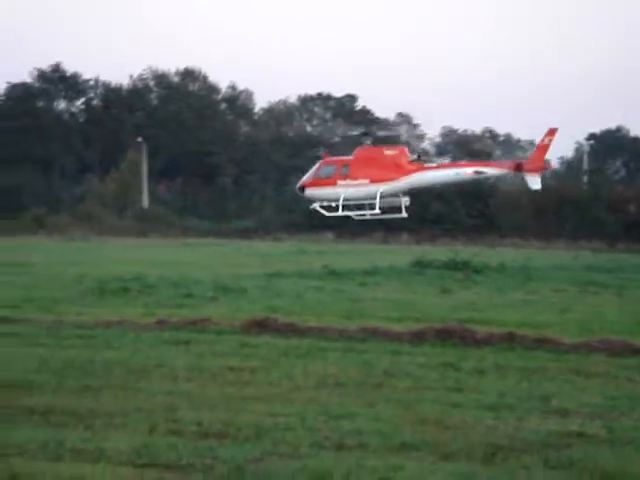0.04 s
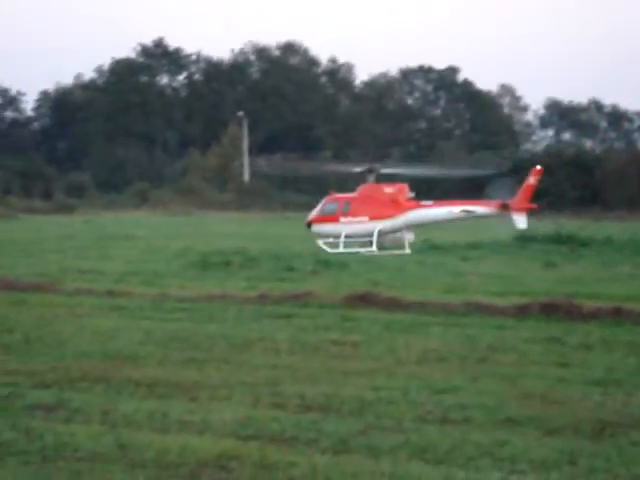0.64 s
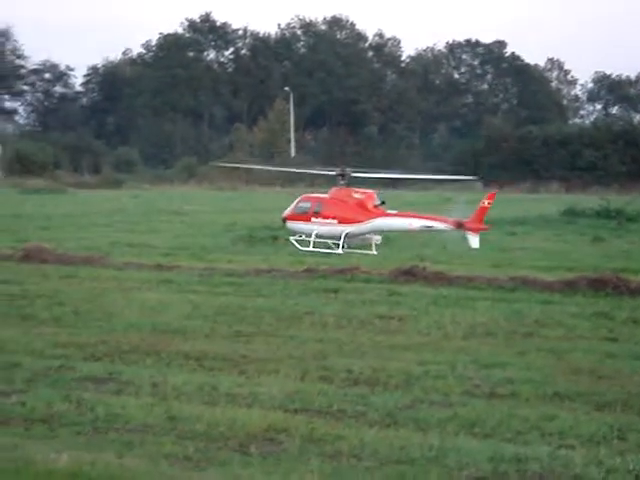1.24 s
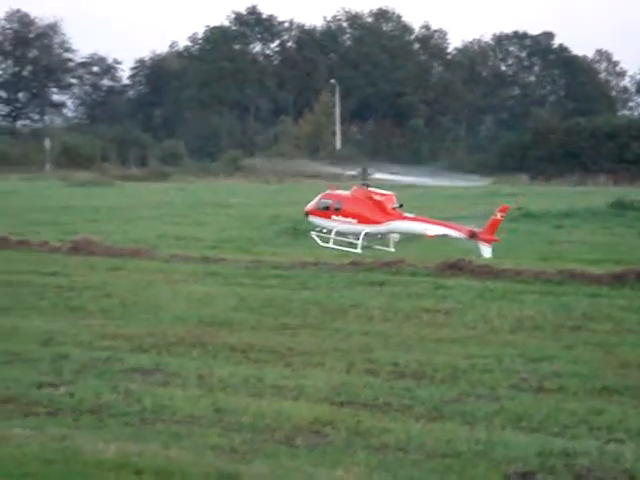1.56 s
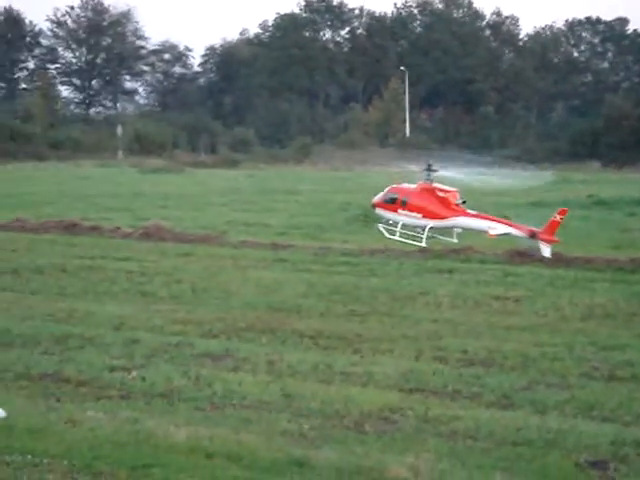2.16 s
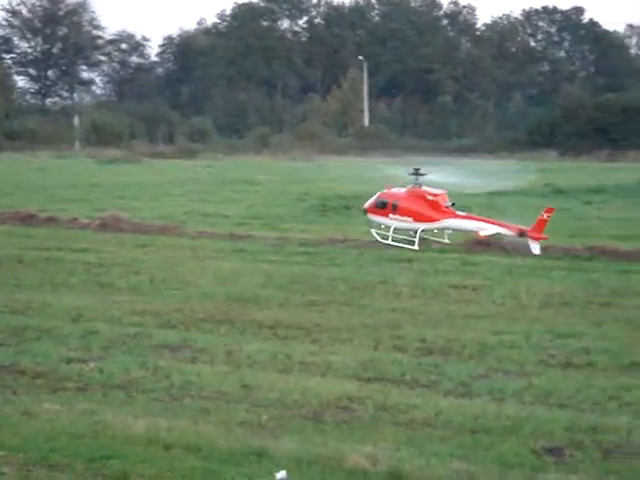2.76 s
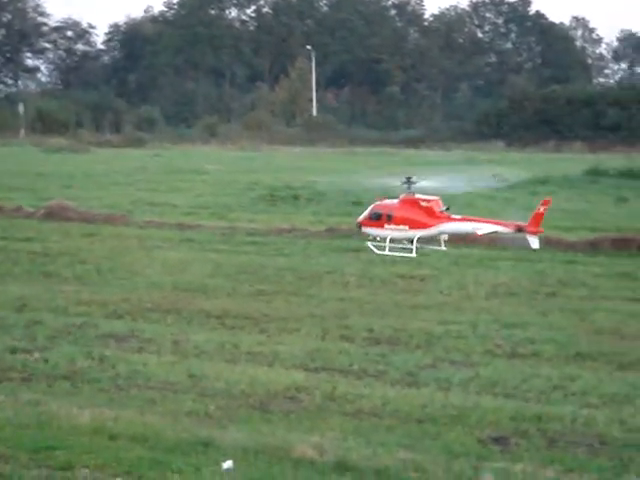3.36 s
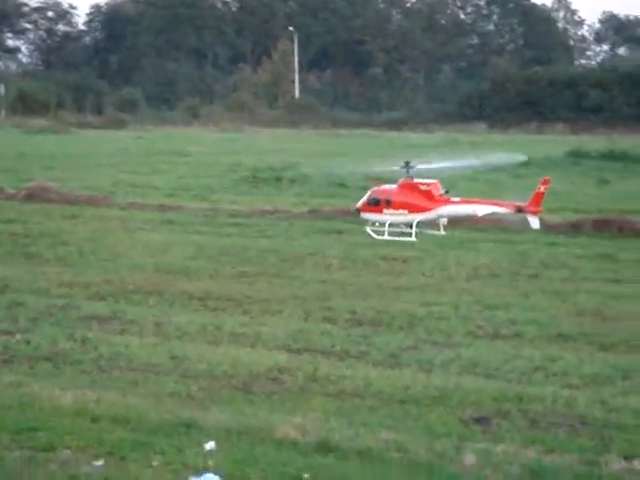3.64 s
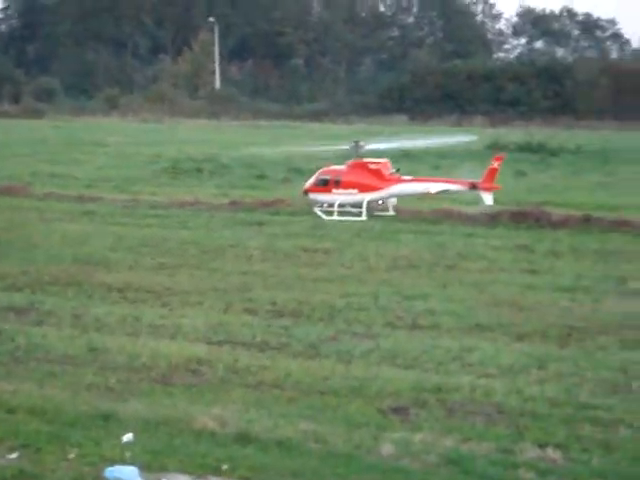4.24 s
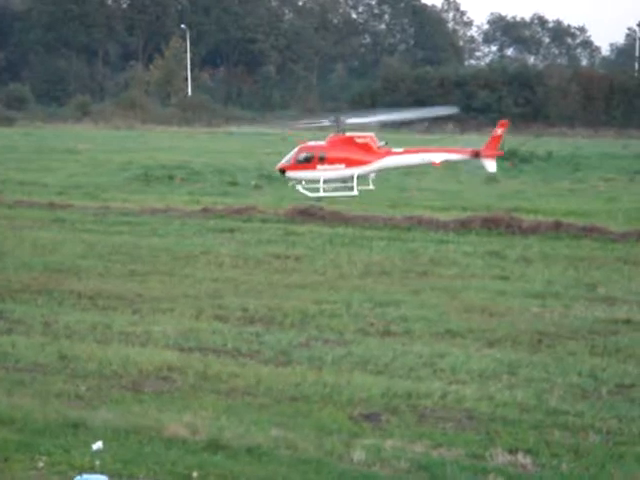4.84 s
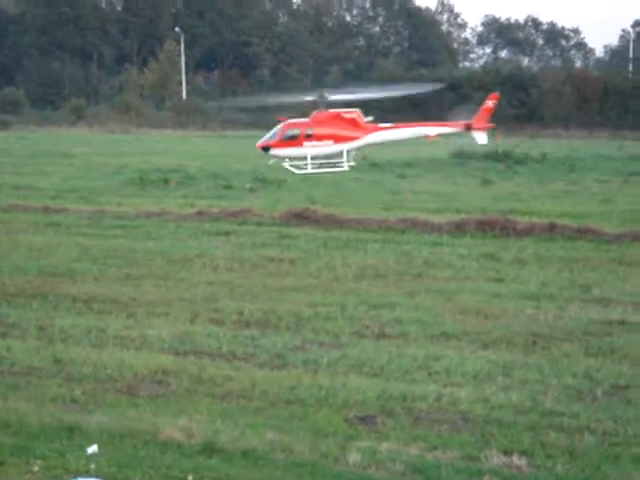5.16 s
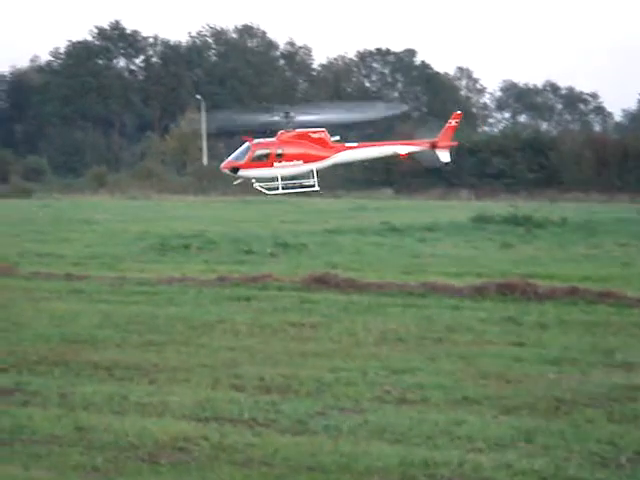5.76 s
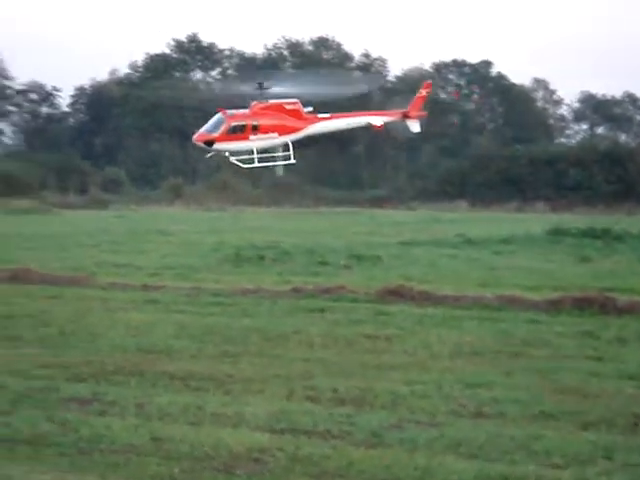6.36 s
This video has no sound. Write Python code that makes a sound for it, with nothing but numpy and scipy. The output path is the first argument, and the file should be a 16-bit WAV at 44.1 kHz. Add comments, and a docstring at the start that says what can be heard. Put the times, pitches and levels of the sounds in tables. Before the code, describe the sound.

Outdoors on a field, a small electric helicopter runs continuously several metres from the microphone. A bright, fluttering whine and metallic gear buzz ride on whirring rotors and a soft hum. The whine softens as the craft sinks and hovers, then returns with a sweeping, shifting tone as it climbs. Light wind bumps the microphone near the start and again near the end.

```python
"""An electric model helicopter hovers low over a grass field, sinking and climbing again.
One motor shaft drives it all: a fluttering whine, a low hum, the chop of the blades,
and the tones, rasp and clicks of the gears. The echo off the ground lifts some pitches and
cancels others, so the tone sweeps as the height changes. A few puffs of wind hit the microphone."""
import sys
import numpy as np
from scipy import signal
from scipy.fft import rfft, irfft, next_fast_len
from scipy.io import wavfile
from scipy.ndimage import map_coordinates

SR = 44100
rng = np.random.default_rng(int(sys.argv[2]) if len(sys.argv) > 2 else 0)


def waveform_to_disk(signal):
    """Save audio, clipped to [-1, 1], as 16-bit WAV at the path in sys.argv[1]."""
    frames = np.transpose(np.atleast_2d(signal))
    scaled = np.clip(frames, -1, 1) * 32767
    samples = np.round(scaled).astype(np.int16)
    wavfile.write(sys.argv[1], SR, samples)


N = 291501

# An "order" is a pitch given as a multiple of the motor speed.
WHINE_ORDERS, WHINE_GAIN_DB, FLUTTER_DEPTHS = (8, 9, 18), (1, 1.46, 2.5), (0.32, 0.051, 0.028)
RING_ORDERS, RING_DB, RING_FLUTTER_DEPTH = (16, 16.475), (-38.5, -40), 0.2
TURNS_PER_FLUTTER = 19.5
# swells of the low, middle and top whine tones: (time [s], relative level [dB])
LOW_SWELLS = [(0.03, -26.5), (0.28, -33.5), (0.54, -21), (0.94, -22.5), (1.68, -49), (2.1, -37),
              (4.48, -27), (4.53, -23), (5.13, -26), (5.33, -40), (5.44, -26.5), (5.79, -30), (6.18, -23.5),
              (6.55, -26)]
MID_SWELLS = [(0.03, -34), (0.17, -48), (0.26, -31), (0.65, -39), (1.04, -34), (1.9, -30), (2.32, -35),
              (2.55, -44), (3.97, -45), (4.55, -30), (4.79, -39), (5.01, -26.5), (6.08, -38), (6.55, -26.5)]
TOP_SWELLS = [(0.02, -26), (0.13, -24), (0.22, -41), (0.33, -26.5), (0.48, -39), (0.62, -25), (0.79, -27),
              (0.88, -38), (1.2, -25.5), (1.52, -36.5), (4.34, -27), (4.49, -35), (4.84, -31.5), (5.0, -48),
              (5.2, -29), (5.8, -27.5), (5.95, -40), (6.11, -25.5), (6.4, -20.5), (6.57, -24)]
# how hard the gears work, which also drives their tones and clicks: (time [s], load [dB])
GEAR_LOAD = [(0, -1), (.5, 3.5), (1, 9), (1.7, 6.5), (2.1, 0), (3.3, -4.5), (4.2, -1.5), (5.8, -17.5),
             (6.6, 9.5)]
# how deeply the whine flutters: (time [s], share [0-1])
FLUTTER_AMOUNT = [(0, 0.2), (.6, 0.9), (.9, 1), (2.8, .7), (4.4, 0.8), (4.8, 0.7), (5.1, 0), (6.6, 0.2)]
def whine(turns):
    """High motor tones flutter about ten times a second, like two close tones beating."""
    (amount,), (load_db,) = in_time(FLUTTER_AMOUNT), in_time(GEAR_LOAD)
    flutter = amount * np.sin(2 * np.pi * turns / TURNS_PER_FLUTTER + 1.1 * drift(1.5))
    swells = (LOW_SWELLS, MID_SWELLS, TOP_SWELLS)
    gains = [from_db(db) * swell_gain(curve) for curve, db in zip(swells, WHINE_GAIN_DB)]
    voices = list(zip(WHINE_ORDERS, gains, FLUTTER_DEPTHS))
    for order, db in zip(RING_ORDERS, RING_DB):  # loaded gears add a metallic ring
        ring_gain = from_db(db + 0.67 * load_db) * ground_gain(order, share=0.74)
        voices.append((order, ring_gain, RING_FLUTTER_DEPTH))
    return sum(gain * rms_one(1 + depth * flutter) * tone(turns, order, depth * amount, waver_hz=30)
               for order, gain, depth in voices)


def swell_gain(curve, roundness=0.33):
    """The whine swells and fades, largely as its ground echo lifts and cancels it."""
    times, db = np.transpose(curve)
    # round tops and narrow gaps
    return np.interp(np.arange(N) / SR, times, from_db(db) ** roundness) ** (1 / roundness)


# the shaft's own note: (time [s], relative level [dB])
SHAFT_LEVEL = [(0.03, -37), (0.14, -33.5), (1.04, -35.5), (1.56, -42), (2.75, -37), (4.77, -32),
               (5.52, -52.5), (6.5, -47)]
# the body rocks back to brake, then leans forward to leave: (time [s], nose down [degrees])
BODY_LEAN = [(0, 3.5), (.8, -1.5), (2.2, 1.5), (4, -3), (5.2, 0.5), (5.7, 11.5), (6.3, 17)]
# tail drive hum and shaft overtones:
# (order [x motor speed], level [dB], change with lean [dB/degree], echo share [0-1], roughness [0-1])
LOW_TONES = [(1.25, -37.6, .15, .5, .05), (2, -42, .05, .45, .15), (3, -39.6, .72, .1, .22),
             (4, -35.5, -1.05, .85, .22), (5, -38.3, -.2, .9, .35), (6, -44.5, -.1, .7, .6)]
def hum(turns):
    """Low tones of the shaft and tail drive, aimed by the body's lean and coloured by the ground."""
    (shaft_db,), (lean,) = in_time(SHAFT_LEVEL), in_time(BODY_LEAN)
    sound = from_db(shaft_db - 1.5) * tone(turns, 1, rough=0.05, waver_hz=8)
    for order, db, db_per_degree, share, rough in LOW_TONES:
        gain = from_db(db + db_per_degree * lean) * ground_gain(order, share)
        sound += gain * tone(turns, order, rough, waver_hz=11.3)
    return sound


TURNS_PER_BLADE, AIR_GAIN_DB = 5, 11
RASP_DB, RASP_SWING, RASP_UNEVEN_DB = -31.5, 1.07, 6.5
# loudness of the rushing air: (time [s], relative level [dB])
AIR_LEVEL = [(0.1, -34.5), (0.24, -34), (3.09, -39), (5.7, -37.5), (6.41, -34.5), (6.5, -35)]
# the rasp's rise and fall, taken around its average: (time [s], relative level [dB])
RASP_LEVEL = [(0.05, -29), (0.27, -26), (0.7, -25), (1.55, -31), (2.31, -26), (3.83, -31), (4.29, -29.5),
              (5.24, -33.5), (5.32, -30), (5.7, -32), (5.93, -29.5), (6.55, -30)]
# tone colour of the air, rasp and clicks: (frequency [Hz], relative level [dB])
RUSH_COLOUR = [(40, -22), (110, -11), (250, -6), (340, -9.5), (470, -1), (650, 2.5), (800, -3.5),
               (1250, 0.5), (1600, -0.5), (3500, -1.5), (4300, -11.5), (6800, -14), (8000, -18),
               (10000, -26)]
def blades_and_rasp(turns):
    """Each blade chops the air, while a buzzing gear rasp swells once a motor turn."""
    (air_db,), (rasp_curve,) = in_time(AIR_LEVEL), in_time(RASP_LEVEL)
    air_gain = from_db(air_db + AIR_GAIN_DB)
    rasp_gain = from_db(RASP_DB + RASP_SWING * (rasp_curve - rasp_curve.mean()))
    air = rng.standard_normal(N) * beat(turns / TURNS_PER_BLADE, sharp=0.15)
    noise = rng.standard_normal(N)
    uneven = from_db(RASP_UNEVEN_DB * np.tanh(drift(42)))  # no two turns are equally loud
    rasp = noise * rms_one(beat(turns, sharp=2.2) * uneven)
    buzz = band(tooth_buzz(turns, repeat_turns=2), 450, "high")
    body = air_gain * coloured(air, RUSH_COLOUR)
    body += rasp_gain * coloured(rasp + from_db(-5) * buzz, RUSH_COLOUR)
    hiss = air_gain * coloured(air + from_db(-7.5) * rasp + from_db(-20) * buzz, RUSH_COLOUR)
    return band(body, 4570, "low", order=4) + band(hiss, 4730, "high", order=4)


def tooth_buzz(turns, repeat_turns):
    """Tiny flaws in the gear teeth come round again and again, making a buzz."""
    size = int(repeat_turns * N / turns[-1])
    flaws = rng.standard_normal(size)
    places = [(turns + ahead) / repeat_turns % 1 * size for ahead in (0, 1)]
    now, next_turn = (map_coordinates(flaws, [at], order=3, mode="grid-wrap") for at in places)
    return rms_one(now - next_turn)  # removes what repeats on every turn


# pitches of the weaker gear tones: (order [x motor speed])
GEAR_TONE_ORDERS = (2.85, 3.2, 3.5, 4.475, 5.5, 6, 6.25, 7, 7.05, 7.5, 7.525, 7.95, 8.475, 9.475, 9.95, 11,
                    11.475, 11.525, 12, 12.475, 13, 14, 15.5, 16.5, 17, 20, 23, 24, 27, 30, 36)
# their loudness, in the same sequence: (level [dB])
GEAR_TONE_DB = (-42, -48.5, -46, -42.5, -45.5, -41, -43, -49.5, -39, -40.5, -38, -38.5, -41, -39.5, -43.5,
                -51, -43, -43, -48, -50, -42.5, -50, -38, -50.5, -50, -50, -54, -52, -48, -56, -55.5)
def gear_tones(turns):
    """Meeting teeth make tones that come and go, beat in close pairs and grow with the load."""
    load_db, = in_time(GEAR_LOAD)
    tones = sum(from_db(db) * tone(turns, order, rough=1.0, waver_hz=2.28)
                for order, db in zip(GEAR_TONE_ORDERS, GEAR_TONE_DB))
    return from_db(0.21 * load_db) * tones


CLICK_DB = -36  # at a load of 0 dB
# the five clicks during each pass of a blade: (relative level [dB])
CLICK_ACCENTS = (7, -5.5, -3.5, -12, -16)
def gear_clicks(turns):
    """One sharp click a motor turn, harder under load, no two quite alike."""
    starts = np.flatnonzero(np.diff(np.floor(turns)))
    accents_db = np.resize(CLICK_ACCENTS, len(starts)) + 3.5 * rng.standard_normal(len(starts))
    spikes = np.zeros(N)
    spikes[starts] = from_db(accents_db)
    clicks = band(coloured(spikes, RUSH_COLOUR), (420, 3900), "band")
    load_db, = in_time(GEAR_LOAD)
    return from_db(CLICK_DB + load_db) * rms_one(clicks)


DISTANCE_M, MIC_HEIGHT_M, SOUND_M_PER_S = 7.96, 1.508, 343
# the helicopter sinks, hovers and climbs again: (time [s], height [m])
FLIGHT_HEIGHT = [(0, 1.5), (0.6, 1.29), (1.3, 0.97), (2.2, 0.79), (3.2, 0.72), (4.3, 0.76), (4.9, .91),
                 (5.5, 1.04), (6.6, 1.35)]
def echo_delay():
    """Seconds by which the ground echo trails the direct sound: fewer when flying low."""
    height, = in_time(FLIGHT_HEIGHT)
    return 2 * height * MIC_HEIGHT_M / DISTANCE_M / SOUND_M_PER_S


def ground_gain(order, share, motor_hz=199.3):
    """A tone meets its own echo, which lifts or weakens it as the height changes."""
    return np.abs(1 + share * np.exp(-2j * np.pi * order * motor_hz * echo_delay()))


def over_grass(direct, share=0.45):
    """The direct sound plus its echo off the grass, which swallows the treble."""
    grass_colour = [(100, -6.0), (700, -0.5), (1500, 1.5), (3000, -3.0), (5000, -9.5), (10000, -8.5)]
    dulled = coloured(direct, grass_colour) * np.std(direct)
    echo = map_coordinates(dulled, [np.arange(N) - echo_delay() * SR], order=3)
    return from_db(-0.67) * (direct + share * echo)


# puffs of wind on the microphone: (time [s], half length [ms], level before the leak [dB])
WIND_PUFFS = [(.343, 5.2, -29), (.561, 5.9, -25), (.732, 5, -26), (.762, 8.8, -32), (1.165, 5.9, -26),
              (1.192, 8, -35), (1.39, 8, -42), (6.30, 2.6, -24), (6.348, 4.8, -26), (6.47, 2.7, -24.5),
              (6.515, 8, -26), (6.55, 5.3, -27)]
def wind():
    """Each puff is one smooth bump of pressure; the microphone lets its slowest part leak away."""
    t = np.arange(N) / SR
    bumps = sum(from_db(db) * np.exp(-((t - at) * 1000 / ms) ** 2) for at, ms, db in WIND_PUFFS)
    return band(bumps + 1e-18, 14, "high", order=1)


def tone(turns, order, rough, waver_hz):
    """A sine of power 1 locked to the shaft; the rougher it is, the more it wavers."""
    angle = 2 * np.pi * (order * turns + rng.random())
    wave = (1 + rough * drift(waver_hz)) * np.sin(angle)
    wave += rough * drift(waver_hz) * np.cos(angle)
    return np.sqrt(2 / (1 + 2 * rough ** 2)) * wave


def beat(cycles, sharp):
    """One swell in each cycle, at power 1."""
    return rms_one(np.exp(sharp * np.cos(2 * np.pi * cycles)))


def drift(hz):
    """A smooth random wobble, about 1 in size and mostly slower than hz."""
    step = 40  # samples between points
    pole = np.exp(-2 * np.pi * hz * step / SR)
    noise = rng.standard_normal(N // step + 2002)
    slow = signal.lfilter([1], [1, -2 * pole, pole * pole], noise)[2000:]
    return np.interp(np.arange(N) / step, np.arange(len(slow)), rms_one(slow))


def coloured(x, colour):
    """Shape a sound by rows of (frequency [Hz], level [dB]), then scale it to power 1."""
    size = next_fast_len(N)
    hz, db = np.transpose(colour)
    gain = from_db(np.interp(np.log(np.fft.rfftfreq(size, 1 / SR) + 1), np.log(hz), db))
    return rms_one(irfft(rfft(x, size) * gain, size)[:N])


def band(x, hz, kind, order=2):
    """Keep the lows, the highs or a band; here order sets how steep the cut is."""
    return signal.sosfilt(signal.butter(order, hz, kind, fs=SR, output="sos"), x)


def in_time(rows):
    """Join a table's points with straight lines, giving a value at every sample."""
    times, *columns = np.transpose(rows)
    return [np.interp(np.arange(N) / SR, times, column) for column in columns]


def from_db(db):
    """Turn decibels into a gain."""
    return 10 ** (np.asarray(db) / 20)


def rms_one(x):
    """Scale to an average power of 1."""
    return x / np.sqrt(np.mean(x ** 2) + 1e-20)


# the motor slows a little as it catches the descent: (time [s], speed [turns/s])
MOTOR_SPEED = [(0, 200.84), (0.9, 198.6), (1.4, 198.6), (2.2, 199.15), (3.2, 199.6), (4.8, 199.25),
               (5.6, 199.5), (6.6, 199.75)]
def scene():
    """Every part of the helicopter keeps time with the motor; the wind comes on top."""
    speed, = in_time(MOTOR_SPEED)
    turns = np.cumsum(speed) / SR
    tones = hum(turns) + whine(turns)
    clatter = gear_tones(turns) + gear_clicks(turns) + blades_and_rasp(turns)
    return (tones + over_grass(clatter) + wind())[None]


def record(dry, cutoff_hz=9950):
    """The highest treble is cut off steeply."""
    return signal.sosfilt(signal.ellip(12, .1, 90, cutoff_hz, fs=SR, output="sos"), dry)


dry = scene()
out = record(dry)
waveform_to_disk(out)
```